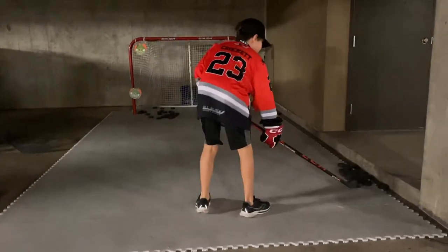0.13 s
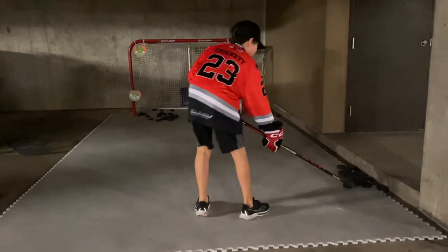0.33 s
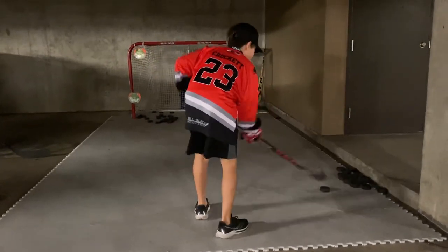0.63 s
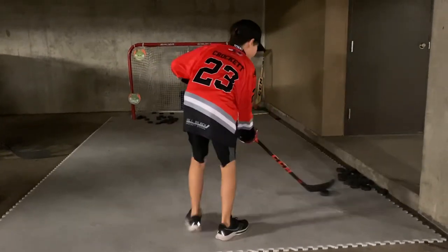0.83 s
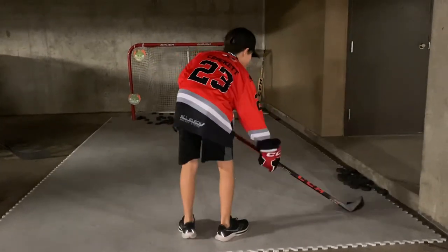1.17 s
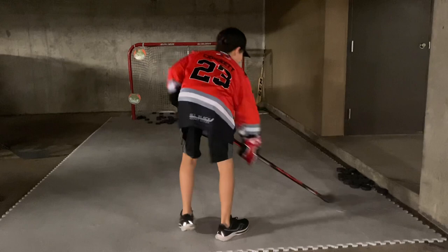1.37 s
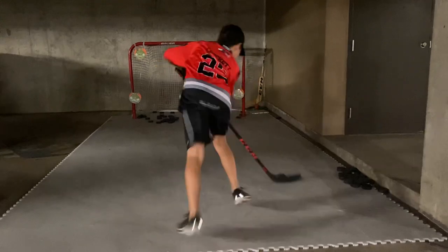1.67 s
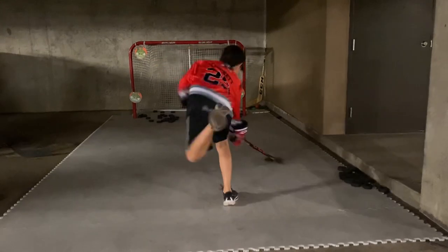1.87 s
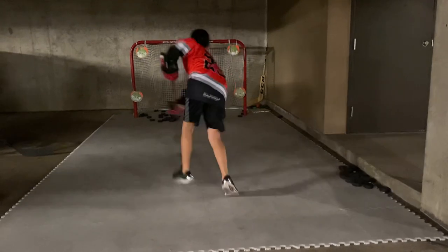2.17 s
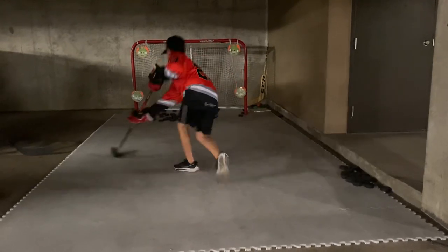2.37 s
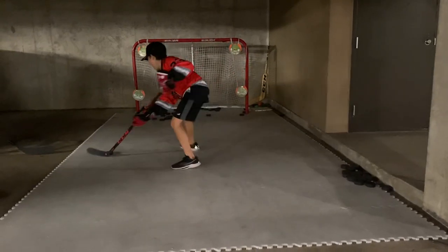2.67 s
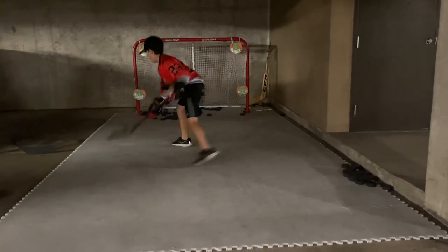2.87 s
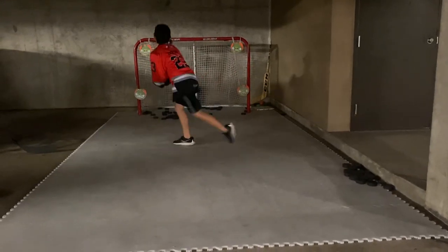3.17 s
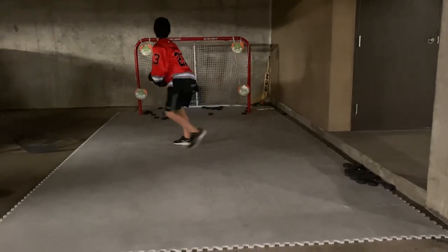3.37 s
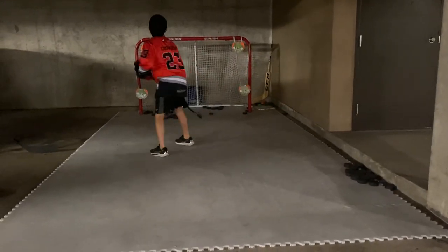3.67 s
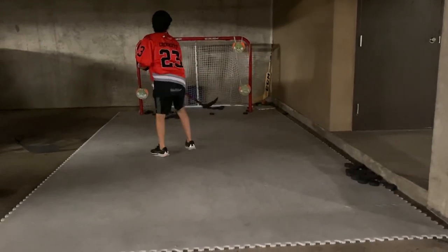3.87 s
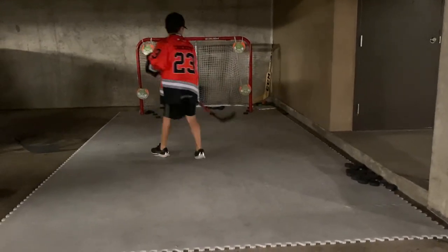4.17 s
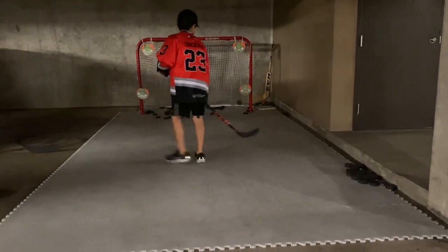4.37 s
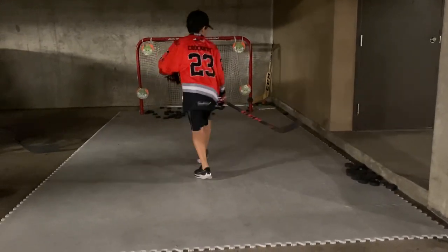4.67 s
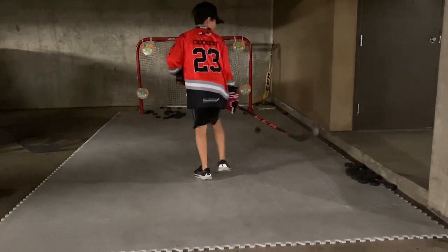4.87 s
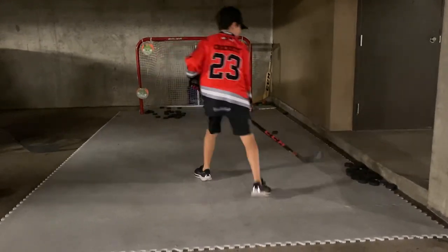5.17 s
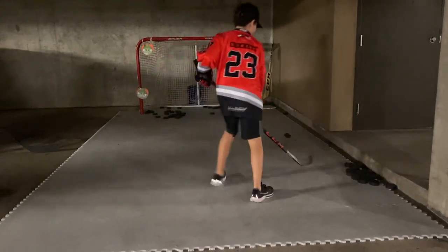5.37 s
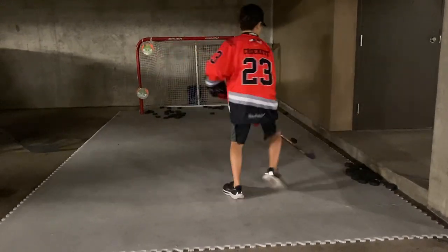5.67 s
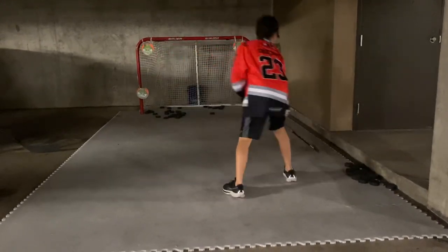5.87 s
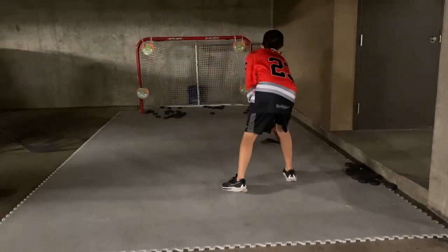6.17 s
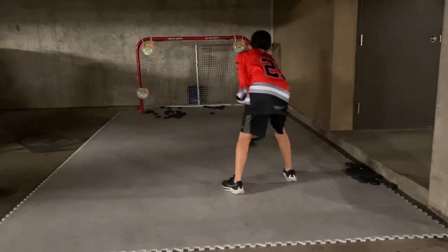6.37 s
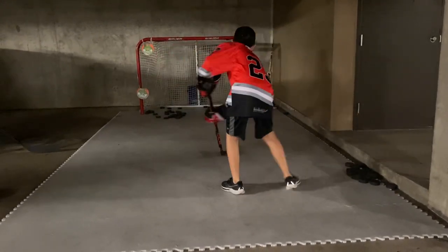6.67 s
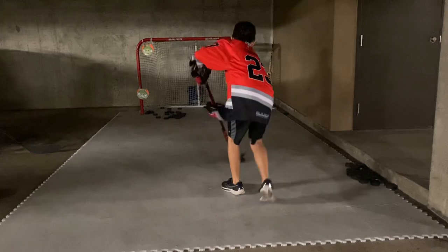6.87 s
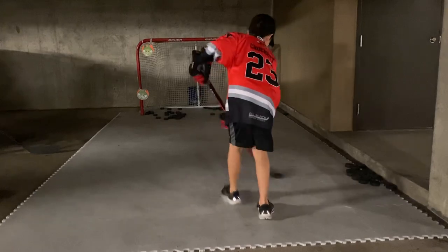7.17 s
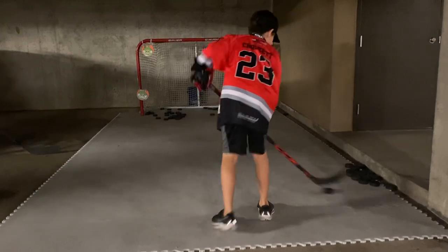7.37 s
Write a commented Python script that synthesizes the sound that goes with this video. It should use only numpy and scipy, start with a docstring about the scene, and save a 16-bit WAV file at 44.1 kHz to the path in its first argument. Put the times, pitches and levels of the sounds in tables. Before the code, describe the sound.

Wide stereo, a few metres from the action, in a bare concrete room with low, steady ventilation rumble and a long bright tail. Faint sliding and a dull hollow tile bump open, then sharp clacks at 0.7 s and a heavier clattering knock at 1.07. A cluster of hard knocks runs from 1.45 to 1.9, with puck rumble and shoe scrapes. A tiny chirp at 2.0 leads into a thin wavering sole squeak until 2.2; a firm clack follows at 2.28, another at 2.77, a drier one at 3.23. After a sparser stretch of faint scrapes, a crisp crack with a bright hiss bursts at 4.22. Lighter, irregular taps from 4.85 to 6.5 mix with gritty rolling and a faint chirp near 6.0. A strong rattly clack hits at 6.62, another at 7.18, and a loud, low-pitched knock at 7.49 closes.

```python
"""Pucks and stick on plastic tiles

A player handles pucks with a stick on plastic tiles in a bare concrete room, over a low ventilation rumble.
Blows are fading sine waves (blade, shaft, tiles, floor) with a snap of noise; rumble and hiss are crowds of
tiny contacts, with a few rubber chirps and one squeak. Echoes and a long bright noise tail stand for the room.
All levels are relative: the mix and the final rounding of peaks scale them again."""
import sys
import numpy as np
from scipy import signal
from scipy.io import wavfile
from scipy.ndimage import uniform_filter1d

SR = 44100
rng = np.random.default_rng(int(sys.argv[2]) if len(sys.argv) > 2 else 0)


def log_audio(samples):
    """Write samples as a 16-bit WAV file to the path given in sys.argv[1]."""
    # one column per channel
    frames = np.atleast_2d(samples).T
    # limit to full scale, then quantise
    limited = np.clip(frames, -1, 1)
    pcm = np.round(limited * 32767).astype(np.int16)
    wavfile.write(sys.argv[1], SR, pcm)


N = 331191

# every blow of blade, puck and tile: (time [s], blade level [dB], blade pitch [Hz], shaft over blade [dB],
# hard edge level [dB], tile level [dB], tile pitch [Hz], ribs level [dB], ribs pitch [Hz], floor level [dB],
# clack sent to the walls [dB], softness [multiple of the usual contact time])
BLOW_TABLE = [(.41, -43, 1200, 2, -50, -53, 472, -21, 810, -55, -7, 8),
              (0.522, -45, 1200, 0, -42, -2, 476, -9, 796, -52, -34, 16),
              (0.7105, -8.5, 1810, -5.5, -14, -27.5, 439, -14, 787, -39, 4.5, 1),
              (0.771, -13, 2130, -4, -23, -21.5, 457, -24, 694, -28.5, -5.5, 1),
              (1.07, -4.5, 1220, -18, -10.5, -8.5, 452, -11.5, 690, -20.5, 0, 1.5),
              (1.082, -17, 1890, 1, -29, -8.5, 470, -15, 666, -34, -12, 2),
              (1.096, -13, 1400, -8, -35, -12, 466, -10, 646, -34, -14, 3),
              (1.4563, -16, 1550, -2, -34, -25, 475.7, -19, 704, -37, -8, 3),
              (1.497, -8, 1115, -25, -21, -18.5, 474, -16.5, 830, -28, 5, 1),
              (1.5746, -4, 1370, -23, -19, -25, 376, -17.5, 750, -29.5, 1, .8),
              (1.6032, -9, 1700, -15, -30, -47, 453, -30, 690, -47, -9, 3),
              (1.7086, -14, 1010, -3.5, -28.5, -26, 482, -24, 794, -43, 3.5, 1),
              (1.8432, -30, 1320, -12, -29.5, -28, 438, -23, 698, -35.5, 14, 1),
              (1.9113, -21.5, 1910, -19, -32.5, -21.5, 479, -21, 850, -32.5, 13.5, 2),
              (2.2625, -21.5, 1720, -5, -41, -22.5, 458, -19.5, 680, -32.5, 5, 2),
              (2.2812, -6, 1240, -20, -24, -22, 520, -16, 725, -33, -1, 1.5),
              (2.3063, -21.5, 1830, -12, -30.5, -31, 460, -32, 690, -65, 13.5, 1),
              (2.328, -31, 1344, 0, -32, -28, 480, -16.5, 687, -44, -9, 3),
              (2.7701, -6, 1730, -5.5, -19, -17.5, 467, -12.5, 686, -22.5, 5.5, 2),
              (2.789, -25, 1500, -4, -23, -24, 506, -23, 665, -37, -11, 3),
              (3.2312, -12.5, 1097, -26, -26.5, -32.5, 538, -22, 785, -29, 2, 1.5),
              (4.2236, -9, 1650, -6.5, -8.5, -21.5, 475, -15.5, 623, -24.5, -1, 1),
              (4.2372, -20, 1310, 1, -20, -21, 459, -15, 644, -36, -11, 1.5),
              (4.8493, -14.5, 1840, -6.5, -18.5, -22, 497, -17, 744, -34.5, 4, 1),
              (5.117, -19, 1710, -1.5, -29, -22.5, 493, -19.5, 677, -36, 3.5, 1),
              (5.2502, -16, 1800, -10, -37, -24, 468, -23.5, 790, -55, -5, 1),
              (5.3361, -17, 1760, -2.5, -35, -19, 456, -19, 695, -42, -1.5, 1),
              (5.36, -30, 1510, 3, -51, -19, 504, -17.5, 714, -34.5, 8, 3),
              (5.8807, -20, 967, -12.5, -32.5, -25, 490, -26, 737, -35, 12, 2),
              (5.903, -20.5, 1170, -15, -44, -27, 554, -35, 844, -45, -16, 1),
              (6.0893, -15.5, 1800, -8, -34, -35, 516, -52, 610, -38, -1.5, 2),
              (6.1442, -19, 1490, -5, -27, -30, 442, -28, 773, -35, 0, 1),
              (6.3206, -20.5, 1150, -6, -29, -23.5, 444, -24.5, 695, -36, -5, 2),
              (6.4999, -35, 1010, -8, -37, -31.5, 460, -32, 770, -41, 7, 1),
              (6.566, -36, 990, -3, -33, -27, 420, -20, 660, -42, 3.5, 4),
              (6.621, -9, 1706, -2, -17.5, -26, 456, -10.5, 767, -35.5, 2, 1),
              (6.649, -16, 1190, -7, -43, -28, 530, -15, 687, -37, 2, 1.5),
              (6.9584, -25.5, 1920, -6.5, -36, -37, 440, -31, 850, -61, 12.5, 1),
              (7.1813, -11, 1800, -6, -21.5, -26, 476, -26, 778, -33.5, 3.5, 1.5),
              (7.403, -22.5, 1730, -4, -27, -49, 440, -50, 895, -56, 0, 1),
              (7.4872, -2, 1220, -26, -11.5, -23.5, 405, -12, 830, -25, 2.5, 2.5)]


def amp(db):
    """Turn a level in dB into a gain."""
    return 10 ** (np.asarray(db) / 20)


def rms_one(x):
    """Scale a signal so that its rms (average strength) is 1."""
    return x / np.sqrt(np.mean(x ** 2) + 1e-20)


def at_hz(points, hz):
    """Read all columns of a table at one frequency, in straight lines on a log frequency axis."""
    table_hz, *columns = np.transpose(points)
    return [np.interp(np.log(hz), np.log(table_hz), column) for column in columns]


def bands(x):
    """Cut noise into half-octave bands, each with its centre; neighbours take the rows of x in turn."""
    edges_hz = 25 * 2 ** np.arange(0, 9.6, .5)
    for k, (low, high) in enumerate(zip(edges_hz, edges_hz[1:])):
        band_filter = signal.butter(2, [low, high], "band", fs=SR, output="sos")
        yield np.sqrt(low * high), signal.sosfilt(band_filter, x[k % len(x)])


def spread(mid, side, hz):
    """Make two channels that are as alike as the table says for this frequency."""
    # how alike left and right are: (frequency [Hz], likeness [0-1])
    likeness = [(60, 0.96), (150, .98), (380, 0.8), (950, 0.3), (2380, 0.25), (5980, 0.12), (15000, 0)]
    alike = np.clip(at_hz(likeness, hz)[0], 0, 1)
    return np.sqrt(1 + alike) * mid + np.sqrt(1 - alike) * side * [[1], [-1]]


def ventilation():
    """Steady low air noise: white noise coloured band by band."""
    # colour of the air noise: (frequency [Hz], level [dB per Hz])
    air_colour = [(15, -43), (25, -15), (59, 4), (185, -4), (294, -6.5), (352, -6.5), (475, -2),
                  (695, -2.5), (3000, -25), (3900, -32), (6600, -120)]
    air_db = -48.5
    white = rng.standard_normal((2, 2, N))
    air = sum(amp(at_hz(air_colour, hz)[0]) * spread(*band, hz) for hz, band in bands(white) if hz < 5000)
    return amp(air_db) * rms_one(air)


def grains(per_s, uneven_db):
    """Two trains of tiny contacts at random moments, with random signs and uneven sizes."""
    sizes = amp(uneven_db * np.minimum(rng.exponential(1, (2, N)), 5))
    sizes = sizes * rng.choice([-1, 1], (2, N))
    happens = rng.random((2, N)) < per_s / SR
    return sizes * happens + 1e-18


def grit():
    """Sliding catches and lets go: an unsteady gain for rumble and hiss."""
    depth_db, smoothing_s = 3, .02
    wobble = uniform_filter1d(rng.standard_normal(N), size=max(int(smoothing_s * SR), 1))
    return rms_one(amp(depth_db * rms_one(wobble)))


def rolling():
    """A puck rumbles over the tiles: coarse contacts shake them."""
    # colour of the rumble: (frequency [Hz], level [dB per Hz])
    rumble_colour = [(90, -32), (150, -13.5), (260, -4.5), (450, 3), (580, 1.5), (720, 5.5), (1100, -2.5),
                     (1700, -7.5), (2600, -11), (4000, -19.5), (6000, -60)]
    # strength of the rumble over time: (time [s], level [dB])
    roll_level = [(0.0, -31), (.12, -34.5), (.33, -48.5), (.42, -39.5), (.46, -25.5), (.51, -28.5),
                  (.58, -40.5), (.67, -37), (1.0, -31), (1.17, -28), (1.8, -28.5), (1.96, -24.5),
                  (2.07, -34), (2.24, -37), (2.36, -25.5), (2.59, -36.5), (3.22, -39), (4.1, -83),
                  (4.27, -28), (4.43, -38), (4.7, -51), (4.89, -39), (5.1, -39), (5.17, -27.5),
                  (5.33, -28.5), (5.69, -48.5), (6.07, -27.5), (6.59, -34), (6.66, -25.5), (6.82, -29.5),
                  (6.95, -32), (7.51, -31.5)]
    contacts = grains(1500, uneven_db=2.5)
    rumble = sum(amp(at_hz(rumble_colour, hz)[0]) * band for hz, band in bands(contacts) if 100 < hz < 5000)
    level_db = np.interp(np.arange(N) / SR, *np.transpose(roll_level))
    return amp(level_db) * grit() * rms_one(rumble)


def hiss_gain():
    """Each hiss starts quickly, swells towards its middle and dies away; overlaps add in power."""
    # scrapes of sole and tape on plastic, and the short bright hiss after the hard blow at 4.22 s:
    # (start [s], length [s], level in the middle [dB])
    hiss_table = [(0.0, 0.066, -45), (0.383, 0.06, -48.5), (0.413, 0.15, -42), (0.716, 0.17, -45),
                  (1.23, 0.21, -42), (1.52, 0.04, -36.5), (1.702, 0.097, -37), (1.842, 0.22, -34.5),
                  (2.078, 0.35, -38), (2.59, 0.16, -46), (2.717, 0.3, -39), (3.207, 0.076, -43),
                  (3.474, 0.085, -48.5), (3.886, 0.27, -44.5), (4.224, 0.06, -28), (4.365, 0.19, -41.5),
                  (4.694, 0.089, -52), (5.07, 0.037, -54), (5.126, 0.31, -51), (5.402, 0.1, -45.5),
                  (5.741, 0.094, -44), (5.886, 0.18, -40.5), (6.215, 0.15, -40), (6.658, 0.21, -42.5),
                  (6.786, 0.1, -36), (6.97, 0.26, -44), (7.194, 0.25, -40)]
    rise_s, arch_db, release_db_per_s = 0.0028, 5, 128
    t = np.arange(0, N, 32) / SR   # a coarse clock is enough for a slow gain
    start_s, length_s, level_db = np.transpose(hiss_table)[:, :, None]
    along = np.clip((t - start_s) / length_s, 0, 1)
    arch = arch_db * (2 * along - 1) ** 2
    release = release_db_per_s * np.clip(t - start_s - length_s, 0, 1)
    rise = np.clip((t - start_s) / rise_s, 0, 1)
    power = np.sum((rise * amp(level_db - arch - release)) ** 2, axis=0)
    return np.interp(np.arange(N) / SR, t, np.sqrt(power))


def hissing():
    """Scrapes, and the hiss after one hard blow: a crowd of fine grains whose bands each flicker alone."""
    # colour of the hiss: (frequency [Hz], level [dB per Hz])
    hiss_colour = [(800, -42), (1700, 2.5), (3000, 3), (4500, 1.5), (6500, 0.5), (8000, -15), (11000, -11),
                   (16000, -13.5)]
    contacts = grains(5000, uneven_db=3.5)
    hiss = sum(amp(at_hz(hiss_colour, hz)[0]) * grit() * band for hz, band in bands(contacts) if hz > 700)
    return hiss_gain() * rms_one(hiss)


def first_echoes(x):
    """The nearest hard surfaces repeat the sound, each with its own delay."""
    # floor, door wall, ceiling, ceiling again: (delay [s], left level [dB], right level [dB])
    echo_table = [(.0033, -2, -13.5), (0.0102, -23, -33), (.014, -14.5, -14.5), (.028, -6, -32)]
    out = x.copy()
    for delay_s, left_db, right_db in echo_table:
        lag = round(delay_s * SR)
        out[:, lag:] += amp([[left_db], [right_db]]) * x[:, :-lag]
    return out


def room(x, build_s, count=7):
    """Reflections thicken within milliseconds, then die band by band on two slopes.
    The sound moves from spot to spot on the floor; the spots take turns, each with its own answer."""
    # t60 is the time to fall by 60 dB: (frequency [Hz], t60 of the near walls [s],
    # t60 of the whole space [s], level of the whole space [dB], colour [dB])
    decay_table = [(102, 0.2, 2.4, -7, 4), (268, 0.18, 3.1, -4.5, 2), (704, 0.38, 2.28, -5.5, 2),
                   (1700, 0.39, 2.5, -3, -0.5), (4670, 0.58, 1.63, -6, -6.5), (7600, 0.55, 1.05, -3, -5),
                   (10800, 0.26, 0.64, -6.5, -1), (15600, 0.11, 0.36, -18, -0.5)]
    step_s = .3   # time from one spot to the next
    t, answers, out = np.arange(3 * SR // 2) / SR, 0, 0
    for hz, band in bands(rng.standard_normal((2, 2, count, 1, len(t)))):
        near_s, far_s, far_db, colour_db = at_hz(decay_table, hz)
        near_power = amp(-120 * t / near_s) / near_s   # 120, as amp of doubled dB gives power
        far_power = amp(2 * far_db - 120 * t / far_s) / far_s
        answers = answers + amp(colour_db) * np.sqrt(near_power + far_power) * spread(*band, hz)
    answers = answers * (1 - np.exp(-t / build_s))
    for k, answer in enumerate(answers):
        away = (np.arange(N) / SR / step_s - k) % count
        here = np.abs(np.sin(np.pi / 2 * np.minimum(away, 2)))   # fade in and out around this spot
        even_answer = answer / np.sqrt(np.sum(answer ** 2) / 2)   # same energy for every spot
        out = out + signal.fftconvolve(here * x[None], even_answer, axes=1)[:, :N]
    return out


def struck(modes, level_db, contact_s, pitch=1, lag_s=0):
    """A blow sets off fading sine waves (modes), each with its own strength; long contact softens the attack."""
    scatter_db = 1.5   # each blow finds the modes a little differently
    blow_s, softness = np.array(BLOW_TABLE)[:, [0, -1]].T
    t, out = np.arange(SR // 8) / SR, np.zeros(N + SR)
    start = np.round((blow_s + np.clip(lag_s, 0, .02)) * SR).astype(int)
    at = start[:, None] + np.arange(len(t))
    luck = rng.standard_normal((len(blow_s), len(modes)))
    contact = np.maximum(contact_s * softness[:, None], 1e-4)
    for k, (multiple, mode_db, t60) in enumerate(modes):
        shape = amp(-60 * t / t60) * (1 - amp(-60 * t / contact))
        height = amp(level_db + mode_db + scatter_db * luck[:, k])[:, None]
        height = height * (-1) ** k   # neighbouring modes start in opposite directions
        wave = np.sin(2 * np.pi * multiple * np.reshape(pitch, (-1, 1)) * t)
        np.add.at(out, at, height * shape * wave)
    return out[:N]


def blow_gain(db):
    """A gain that holds from each blow to the next."""
    blow_s = np.array(BLOW_TABLE)[:, 0]
    latest = np.searchsorted(blow_s, np.arange(N) / SR + 1e-4) - 1
    return amp(db)[np.clip(latest, 0, None)]


def tile_thud(tile_db, tile_hz, ribs_db, ribs_hz, floor_db):
    """The ribs, then the whole tile and the floor under it, give way a moment after the clack."""
    # floor under the tiles: (frequency [Hz], level [dB], t60 [s])
    floor_modes = [(162.6, 4.5, 0.022), (292.5, 7, 0.024)]
    # a whole hollow tile: (multiple of the tile pitch, level [dB], t60 [s])
    tile_modes = [(.86, -1.5, 0.023), (1, -0.5, 0.074)]
    # the ribs of the tile: (multiple of the ribs pitch, level [dB], t60 [s])
    rib_modes = [(.82, -0.5, 0.021), (1, 3.5, 0.025), (1.26, -7, 0.05)]
    ribs_lag_s, tile_lag_s = 0.001455, 0.002944
    thud = struck(floor_modes, floor_db, contact_s=0.012, lag_s=tile_lag_s)
    thud = thud + struck(tile_modes, tile_db, contact_s=0.0093, pitch=tile_hz, lag_s=tile_lag_s)
    return thud + struck(rib_modes, ribs_db, contact_s=0.0095, pitch=ribs_hz, lag_s=ribs_lag_s)


def blows():
    """Blade, shaft, hard edge and thud of each blow, as heard directly and as sent to the walls."""
    # the blade, whose pitch depends on where it is struck and how it is pressed:
    # (multiple of the blade pitch, level [dB], t60 [s])
    blade_modes = [(1, -1, 0.0091), (1.31, 0.5, 0.0046)]
    # the hollow shaft: (multiple of the blade pitch, level [dB], t60 [s])
    shaft_modes = [(.64, 7, 0.0077), (.8, -8, 0.029)]
    # hard rubber against a hard edge: (frequency [Hz], level [dB], t60 [s])
    crack_modes = [(2645, 3.5, 0.0042), (3340, 5.5, 0.0044), (3820, 8, 0.0028), (5085, 6.5, 0.002),
                   (7140, -0.5, 0.0034)]
    snap_db, snap_growth = -2.5, 1.38   # treble snap of the edge; it grows faster than the crack
    pan_mean_db, pan_scatter_db = -1.5, 3.5   # left over right: each blow falls on its own spot
    thud_follows = 0.23   # share of the clack's send that the thud follows

    (blow_s, blade_db, blade_hz, shaft_db, edge_db, tile_db, tile_hz,
     ribs_db, ribs_hz, floor_db, send_db, _) = np.transpose(BLOW_TABLE)
    blade = struck(blade_modes, blade_db, contact_s=0.0032, pitch=blade_hz)
    shaft = struck(shaft_modes, blade_db + shaft_db, contact_s=0.0037, pitch=blade_hz)
    crack = struck(crack_modes, edge_db, contact_s=0.00036)
    thud = tile_thud(tile_db, tile_hz, ribs_db, ribs_hz, floor_db)

    # the snap is treble noise that swells and fades after a single click
    clicks = np.zeros(N)
    clicks[np.round(blow_s * SR).astype(int)] = amp(snap_db + snap_growth * edge_db)
    fade, swell = (signal.lfilter([1], [1, -amp(-60 / (t60 * SR))], clicks) for t60 in (.02, .005))
    treble = signal.butter(3, 7000, "high", fs=SR, output="sos")
    snap = (fade - swell) * signal.sosfilt(treble, rng.standard_normal(N))

    pan_db = pan_mean_db + pan_scatter_db * rng.standard_normal(len(blow_s))
    left_right = [blow_gain(pan_db / 2), blow_gain(-pan_db / 2)]
    heard = (blade + shaft + amp(-5.0) * crack + amp(1.2) * thud + snap) * left_right
    clack = amp(0.5) * blade + amp(1.0) * shaft + crack + amp(17) * signal.sosfilt(treble, clicks)
    sent = clack * blow_gain(send_db) + thud * blow_gain(thud_follows * send_db)
    no_bass = signal.butter(3, 130, "high", fs=SR, output="sos")   # small bodies radiate no deep bass
    return signal.sosfilt(no_bass, heard), signal.sosfilt(no_bass, sent)


def chirps():
    """Rubber catches for a moment and chirps: short bell-shaped bursts of tone."""
    # (time of the peak [s], frequency [Hz], level [dB])
    chirp_table = [(1.98, 5700, -36), (5.974, 3460, -39)]
    half_length_s = 0.0074   # from the peak down to 37 percent
    steps = np.arange(-SR // 25, SR // 25)
    out, t = np.zeros(N), steps / SR
    for peak_s, hz, level_db in chirp_table:
        bell = np.exp(-(t / half_length_s) ** 2)
        out[round(peak_s * SR) + steps] += amp(level_db) * bell * np.sin(2 * np.pi * hz * t)
    return out


def squeak(waver_hz):
    """The rubber sole sticks and slips on plastic: a thin wavering tone."""
    # path of the tone: (time [s], frequency [Hz], level [dB])
    squeak_path = [(2.055, 3240, -40), (2.075, 3234, -35), (2.11, 3220, -35), (2.14, 3400, -51),
                   (2.16, 3150, -56), (2.2, 3040, -54), (2.218, 3150, -47.5)]
    path_s, path_hz, level_db = np.transpose(squeak_path)
    t = np.arange(N) / SR
    waver = waver_hz * rms_one(uniform_filter1d(rng.standard_normal(N), size=200))
    fade = np.clip(np.minimum(t - path_s[0], path_s[-1] - t) / .02, 0, 1)   # 20 ms at both ends
    gain = amp(np.interp(t, path_s, level_db)) * fade
    return gain * np.sin(2 * np.pi * np.cumsum(np.interp(t, path_s, path_hz) + waver) / SR)


def scene():
    """Mix the direct sounds, the answer of the room and the air."""
    build_s = 0.0014   # reflections thicken
    heard, sent = blows()
    rumble = rolling()
    hiss = hissing() + squeak(waver_hz=88.0)
    direct = first_echoes(heard) + amp(-10.5) * rumble
    direct = direct + first_echoes(amp(-8.5) * np.array([hiss, hiss]))
    tail = room(sent + amp(-6.5) * rumble + amp(-2.5) * hiss, build_s)
    return direct + tail + ventilation() + chirps()


def record(dry):
    """The right microphone is a little louder, peaks are rounded, the top is cut."""
    cutoff_hz = 16800
    loud = dry * amp([[-.4], [.4]])
    rounded = 1.535 * np.tanh(loud / 0.99)
    top_cut = signal.cheby2(12, 70, cutoff_hz, fs=SR, output="sos")   # 70 dB down from the cutoff on
    return signal.sosfilt(top_cut, rounded)


dry = scene()
out = record(dry)
log_audio(out)
```